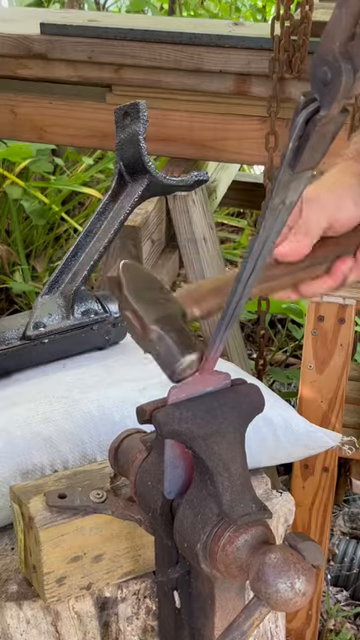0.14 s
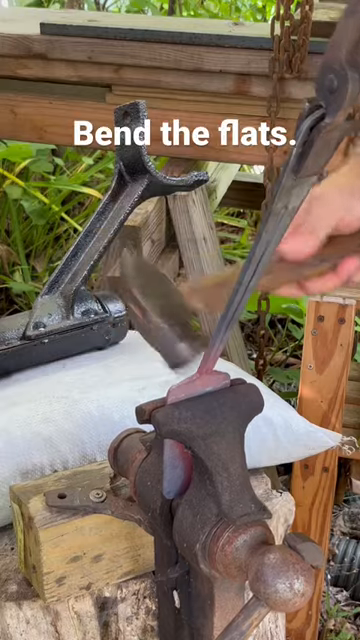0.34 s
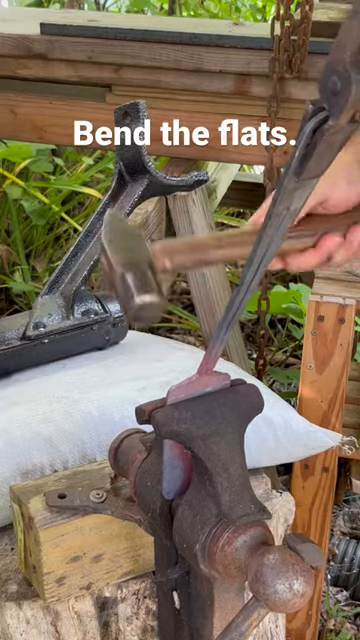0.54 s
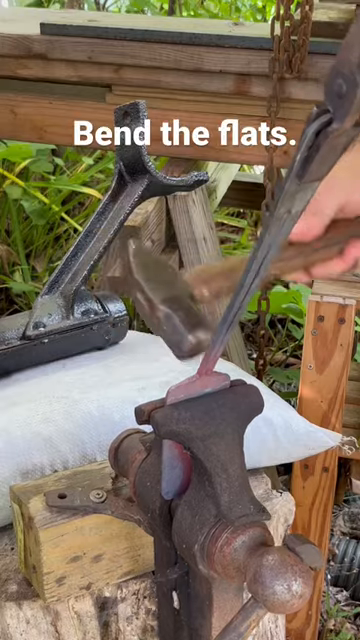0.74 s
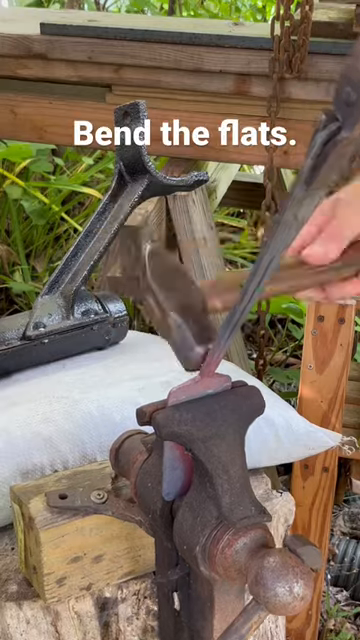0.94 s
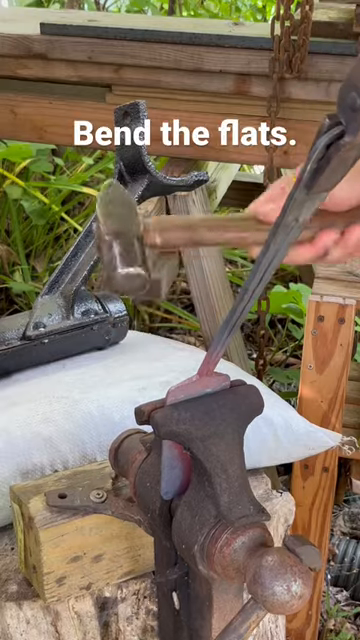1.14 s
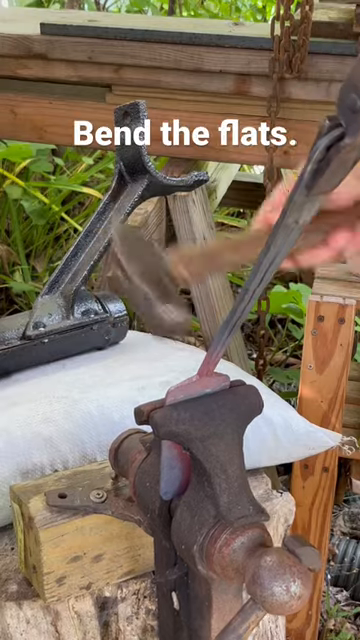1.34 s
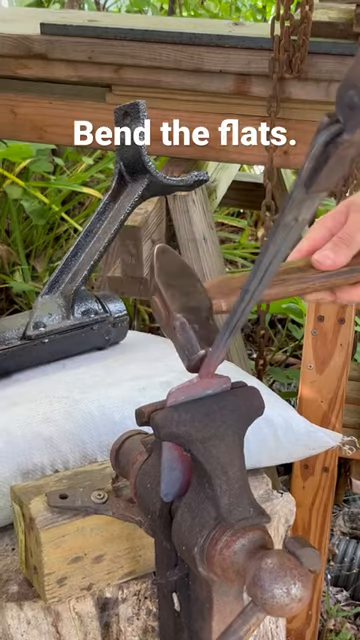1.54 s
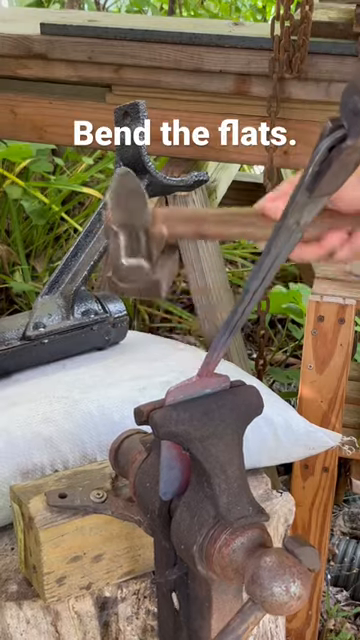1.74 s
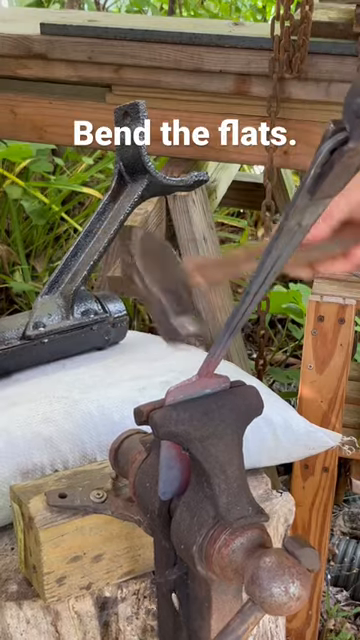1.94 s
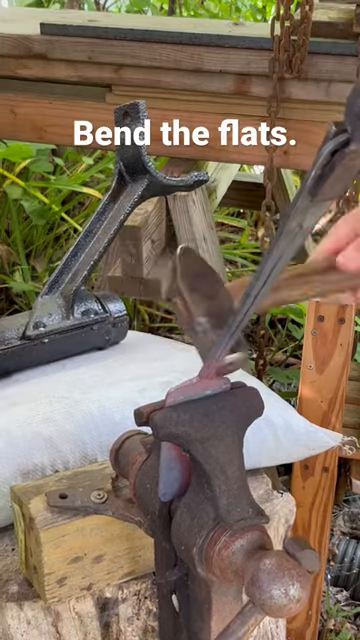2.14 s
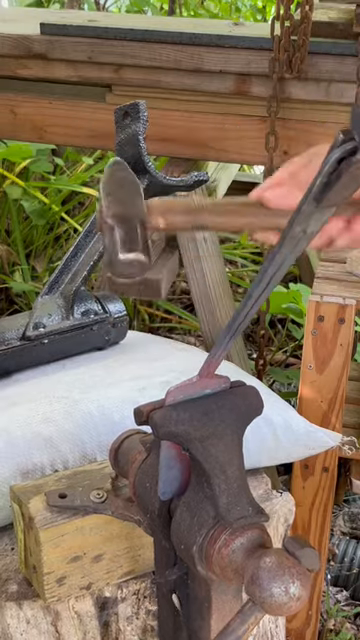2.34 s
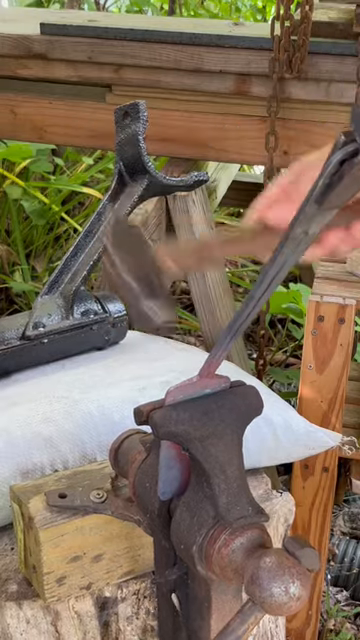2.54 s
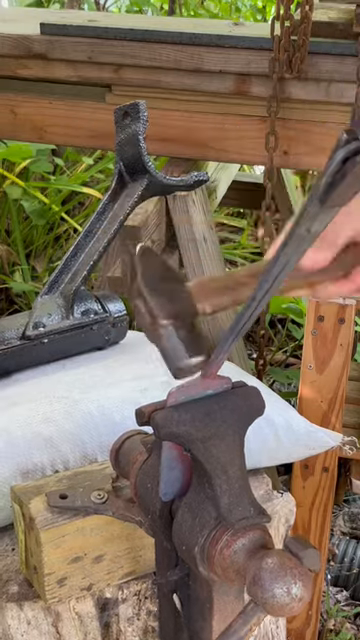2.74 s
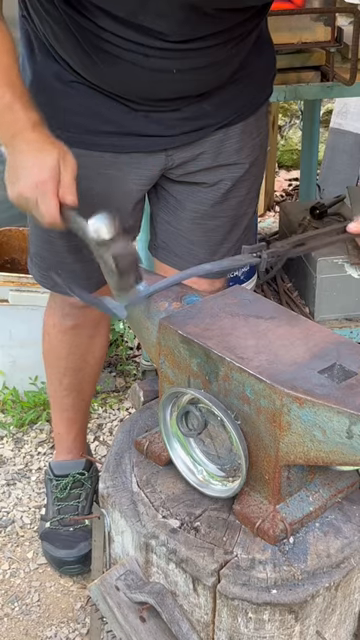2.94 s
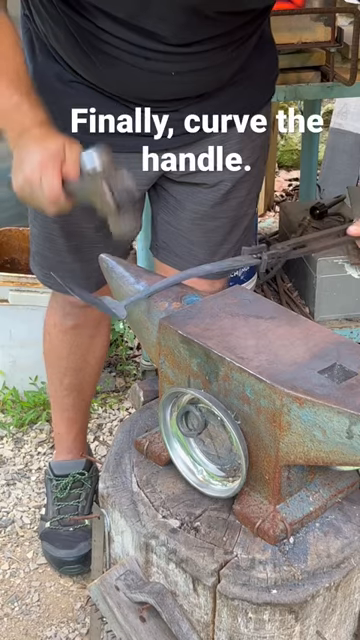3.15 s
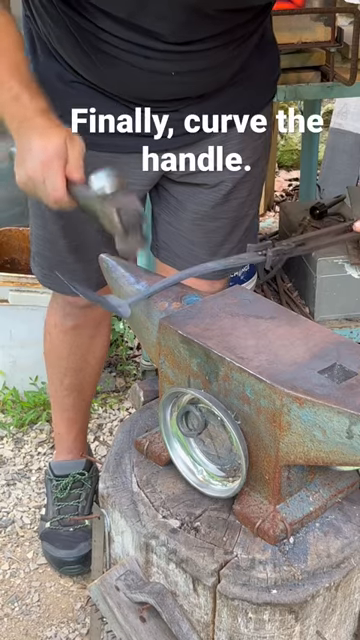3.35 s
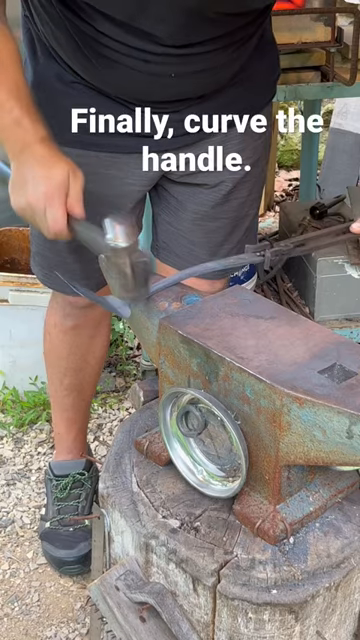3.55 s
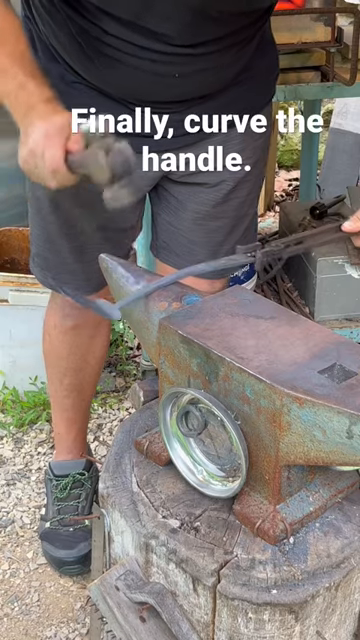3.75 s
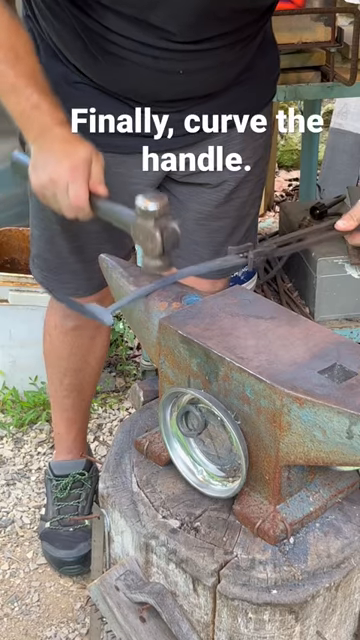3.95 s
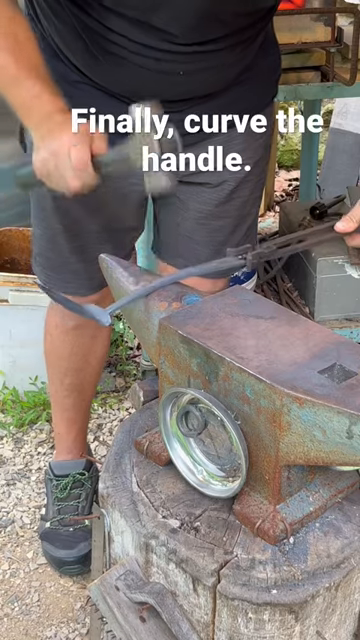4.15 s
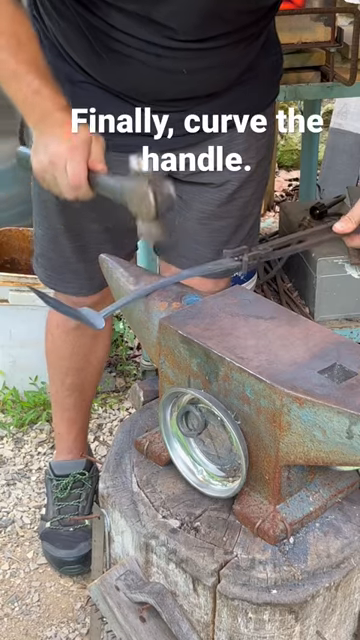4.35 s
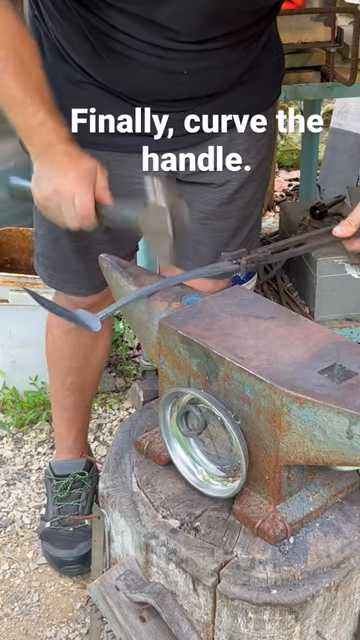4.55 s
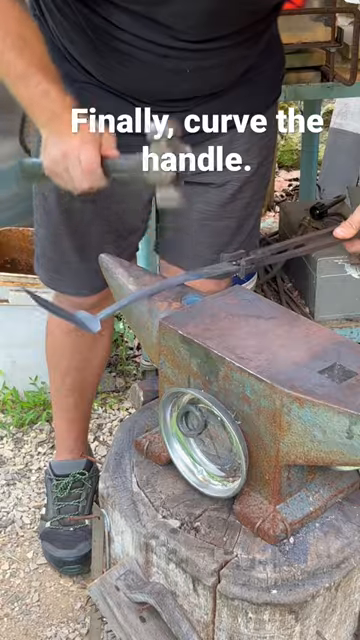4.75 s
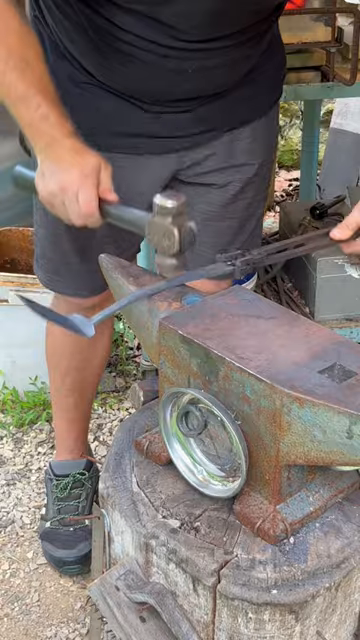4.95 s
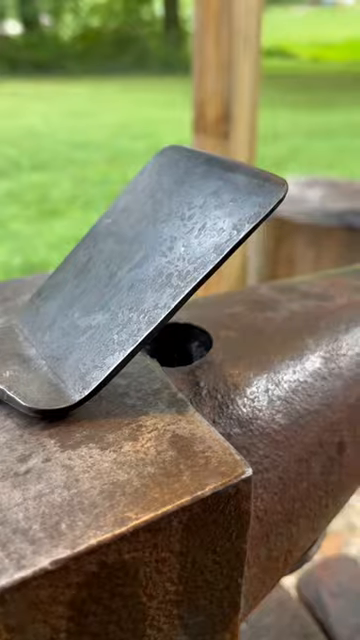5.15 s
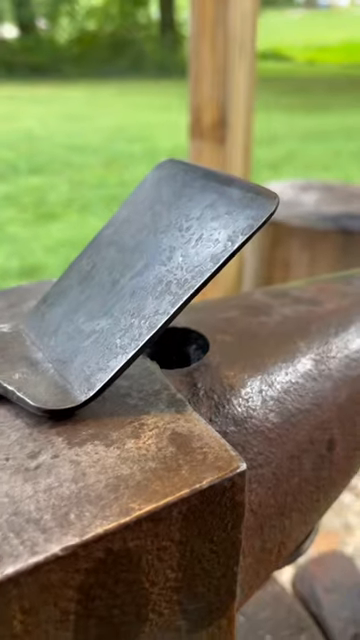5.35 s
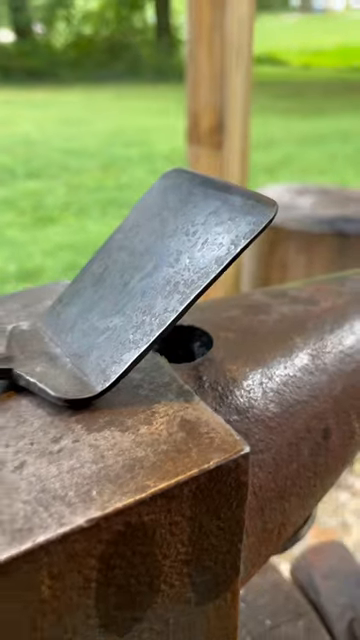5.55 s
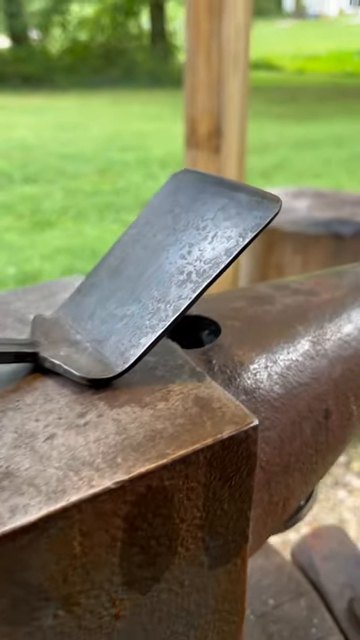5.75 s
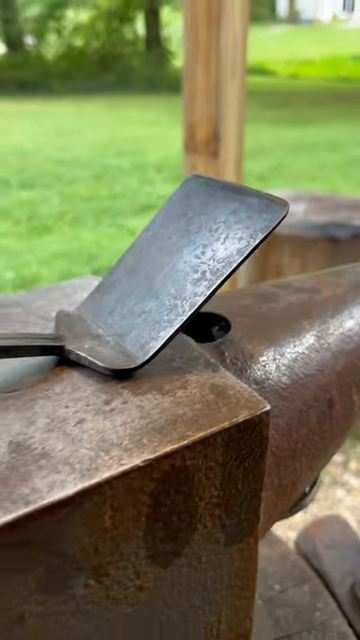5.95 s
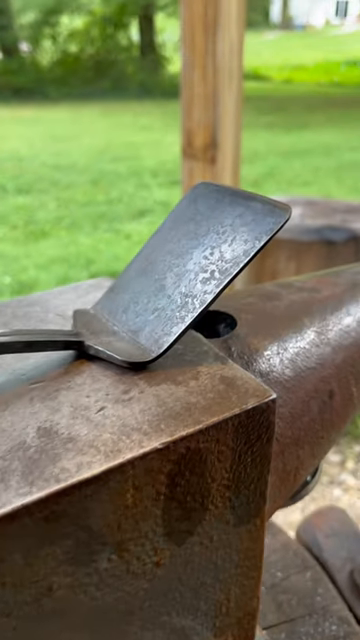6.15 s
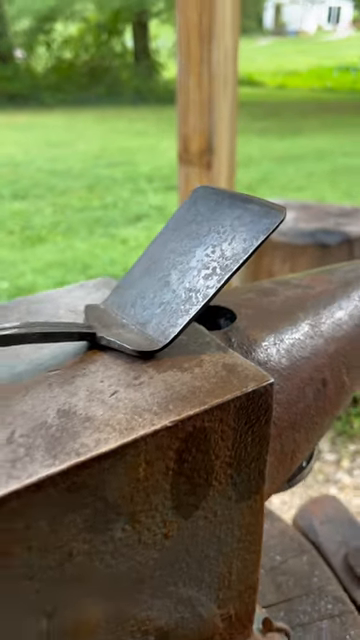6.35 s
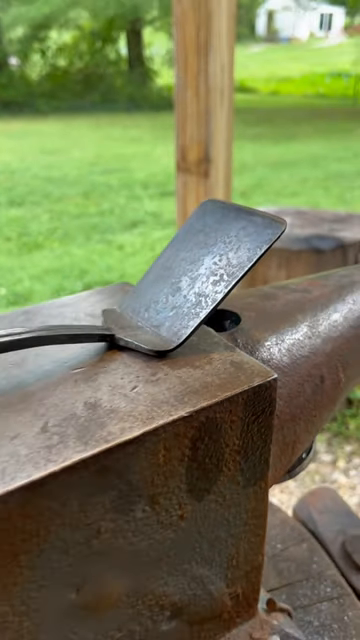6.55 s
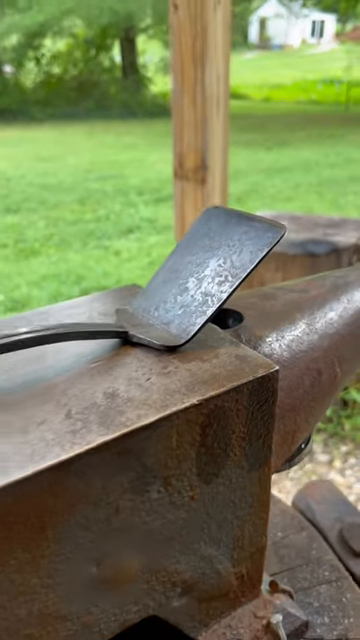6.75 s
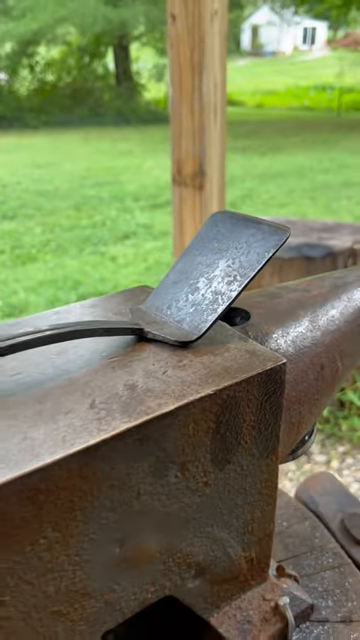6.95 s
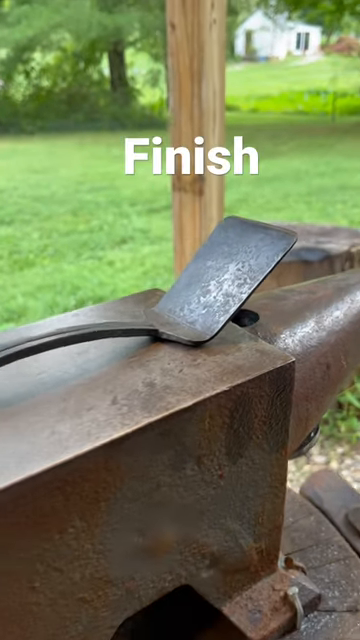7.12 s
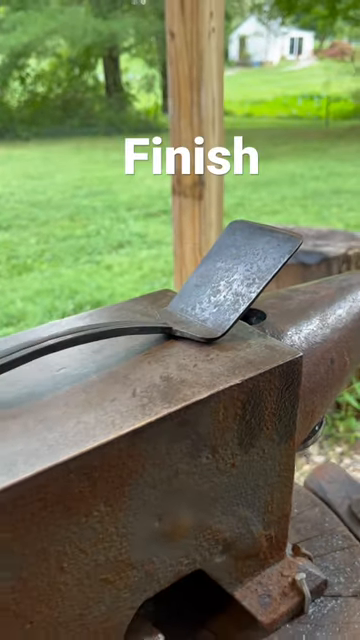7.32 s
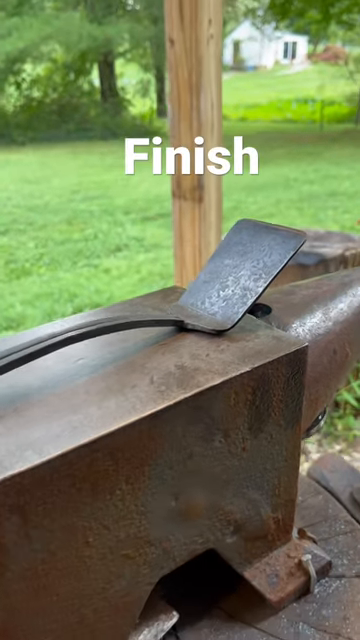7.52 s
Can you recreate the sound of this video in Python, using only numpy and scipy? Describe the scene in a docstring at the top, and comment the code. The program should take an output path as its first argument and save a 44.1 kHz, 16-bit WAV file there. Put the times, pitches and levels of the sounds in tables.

```python
"""Open-sided smithy in four short takes: a flat blow on the anvil face over a dull forge roar; a hammer bending
hot steel in a vise beside a roaring gas forge; blows curving a bar on the ringing horn, forge far off; a quiet
yard with insects. Blows are noise bursts plus decaying modes and low thuds; the forge is resonances driven by
slow noise over shaped noise; the yard is shaped noise. The result is stereo, the left channel ahead in the
treble."""
import sys
import numpy as np
from scipy import signal
from scipy.fft import rfft, irfft
from scipy.io import wavfile
from scipy.ndimage import uniform_filter1d

SR = 44100
rng = np.random.default_rng(int(sys.argv[2]) if len(sys.argv) > 2 else 0)


def unload_wav(signal):
    """Save mono or channel-first audio to the path in sys.argv[1] as 16-bit WAV at rate SR, clipped to [-1, 1]."""
    wavfile.write(
        sys.argv[1],
        SR,
        np.round(np.clip(np.atleast_2d(signal).T, -1, 1) * 32767).astype(np.int16),
    )


N = 334263

# Ends of the face, vise and horn takes: end_s
TAKE_ENDS_S = (.0946, 2.858, 5.118)
FACE_END_S, VISE_END_S, HORN_END_S = TAKE_ENDS_S

# Flat blow on the anvil face: start_s, level_db
FACE_BLOW = (.0898, -8)
# Modes of the anvil face: mode_hz, level_db, t60_s (each ring() call scales the t60 of its modes)
FACE_MODES = [(725, 0, .04), (1300, 1.5, 0.037), (1680, -7, .04), (2390, 2.5, 0.044), (3014, -12, .03),
              (4000, 1, 0.035), (5460, -18.5, .03), (6400, -14, 0.034), (7950, -15, .03),
              (9500, -10.5, .03)]
# Forge heard from the face: freq_hz, density_db_per_hz
FACE_FORGE_SPECTRUM = [(30, -72.5), (60, -57), (140, -51), (340, -53), (600, -78.5), (1000, -64.5),
                       (1500, -94.5), (2230, -75), (2700, -89.5), (4000, -92.5), (8000, -93.5),
                       (12000, -100), (15000, -115)]

# Forge chamber resonances: centre_hz, pole_width_hz, level_db (strongest row takes its level from BURNER)
CHAMBER_MODES = [(58.2, 3, -35.5), (85.5, 10, -44), (108.4, 8.7, -25), (144.9, 18, -33), (171.5, 3, -37.5),
                 (215.4, 4.6, -40), (289.3, 14, -46.5), (370, 22, -45), (434, 14, -50), (1051, 54, -51),
                 (1820, 200, -57.5)]
# Burner swell: time_s, hum_db
BURNER = [(0.1, -21), (0.15, -25.5), (0.28, -18.5), (0.35, -29.5), (0.46, -21), (0.51, -26), (0.64, -18),
          (0.84, -32.5), (0.91, -22.5), (1.24, -24), (1.3, -36.5), (1.5, -20), (1.7, -33), (1.75, -22.5),
          (1.9, -32), (2.15, -26), (2.21, -39.5), (2.31, -25), (2.47, -36.5), (2.49, -28), (2.57, -48),
          (2.63, -24.5), (2.86, -36)]
# Flame noise, before a 6 dB cut below 500 Hz: freq_hz, density_db_per_hz
ROAR_SPECTRUM = [(30, -64.5), (57, -62.5), (80, -50.5), (110, -39), (145, -66.5), (200, -56.5), (400, -63),
                 (700, -73), (1050, -76), (1500, -78), (2100, -78), (3000, -82.5), (8000, -94),
                 (15000, -110)]
HISS_SHARE = 0.19  # part of the hum's dB swell that the flame noise follows

# Blows at the vise: start_s, strength_db, brightness_db_per_octave, vise_clank_db
VISE_BLOWS = [(0.1117, -1, -0.8, -19.5), (0.3763, 0.2, 0.5, -17), (0.6629, -0.5, 1.5, -15.5),
              (0.9572, -1.5, 3, -21), (1.2413, -4, 2.7, -22.5), (1.5461, -1, -0.8, -19),
              (1.838, 2, 0.9, -17), (2.137, 0.1, 0, -24), (2.4373, -4.5, 1.3, -32.5), (2.7416, 2, 1, -21.5)]
# Colour of the vise crack, only its shape counts: freq_hz, density_db_per_hz
VISE_CRACK = [(200, -47), (400, -53), (800, -45.5), (1500, -54), (2200, -50.5), (3000, -48.5),
              (4500, -50.5), (6500, -54), (9000, -57), (12000, -59), (15500, -67.5)]
# Colour of the vise rattle, only its shape counts: freq_hz, density_db_per_hz
VISE_RATTLE = [(200, -58), (400, -51.5), (800, -66), (1500, -66), (2200, -60.5), (3000, -60), (4500, -62),
               (6500, -69), (9000, -73), (12000, -75), (15500, -77.5)]
# Modes of the hammer head: mode_hz, level_db, t60_s
HAMMER_HEAD_MODES = [(2230, -2.5, 0.012), (4900, -1.5, .014), (6470, 0.5, 0.0097), (10400, 0.5, 0.0037)]
# Modes of the vise with the clamped blade: mode_hz, level_db, t60_s
VISE_MODES = [(288, 0.5, 0.089), (718, 0, 0.077), (916, 1.5, 0.024), (1250, -1.5, 0.044), (1446, -3, 0.073),
              (1805, 0, .05), (2110, -3.5, 0.03), (2600, 3.5, .05), (2910, 1.5, .08), (3150, -2.5, 0.041),
              (3530, -15, 0.054), (4000, -21.5, .05), (4540, -2, 0.029), (5050, 4, .05), (6200, -24, 0.014),
              (6120, 9, .05), (9420, -7.5, 0.022), (11100, -6, 0.036)]
VISE_RATTLE_DB, VISE_RATTLE_T60_S = -17.5, 0.15  # level relative to the blow's strength
VISE_THUD_DB, THUD_DB_PER_BRIGHTNESS = -21.5, -2  # duller blows push the bench harder

# Work and tongs knocking back: start_s, level_db, chatter_t60_s, brightness_db_per_octave, handle_knock_db
REBOUNDS = [(0.4162, -11.5, 0.049, -0.3, -29), (0.9722, -24, .092, 1, -48), (1.0128, -26, 0.047, -2.5, -25),
            (1.2544, -23, 0.15, 0.1, -45), (1.2859, -15.5, .063, 1.5, -50), (1.5577, -15, 0.1, -3, -33),
            (1.5938, -14.5, 0.068, -0.2, -20), (1.8592, -19.5, 0.088, -1, -21.5),
            (2.1478, -11, 0.098, -0.7, -19), (2.4488, -19, 0.16, 2.5, -38),
            (2.4783, -10.5, 0.052, 4.5, -41), (2.9164, -14.5, 0.15, 2.5, -48),
            (3.2364, -13.5, 0.14, 2.5, -27), (3.2697, -18, .14, 3, -46), (3.6042, -15.5, 0.1, 2.5, -43),
            (3.626, -23, .07, 7, -48), (3.9428, -13.5, 0.042, 0.2, -28), (3.9708, -22.5, 0.14, 4, -48),
            (4.0034, -30, 0.15, 0, -56), (4.0167, -32, .11, 5, -54), (4.2597, -13, 0.11, -3, -23),
            (4.5995, -9, 0.083, 0.5, -22)]
# Mode of the wooden handle: mode_hz, level_db, t60_s
HANDLE_MODES = [(730, 0, 0.083)]
REBOUND_CLANK_DB, CLANK_SHARE = -28, .3  # the clank follows only a share of the rebound's dB

# Blows on the horn: start_s, strength_db, brightness_db_per_octave, clank_db, low_knock_db,
# ring_family_1_db, ring_family_2_db, bar_settles_after_s
HORN_BLOWS = [(2.8828, -10, 1.6, -13.5, -16.5, -20, -35, .4), (3.2249, -8, 1, -18, -23, -26, -32, 0.15),
              (3.5739, -5, 1.1, -14, -10.5, -18.5, -46, 0.33),
              (3.9147, -6, 1.9, -18.5, -10, -16.5, -33, 0.13), (4.244, -3, 1.3, -18, -14, -16, -30.5, .4),
              (4.585, -2.5, 1.04, -19.5, -10.5, -15, -33.5, .4),
              (4.915, -3, 0.3, -15.5, -8.5, -17.5, -39, .4)]
# Colour of the anvil crack, only its shape counts: freq_hz, density_db_per_hz
HORN_CRACK = [(200, -46), (400, -47.5), (800, -42.5), (1500, -56.5), (2200, -40.5), (3000, -61),
              (4500, -50), (6500, -60), (9000, -55), (12000, -54), (15500, -59)]
# Colour of loose bar and tongs, only its shape counts: freq_hz, density_db_per_hz
HORN_RATTLE = [(200, -52.5), (400, -55.5), (800, -70.5), (1500, -62), (2200, -60.5), (3000, -58.5),
               (4500, -59.5), (6500, -65), (9000, -64.5), (12000, -67), (15500, -73)]
# Modes of bar and tongs clanking: mode_hz, level_db, t60_s
BAR_MODES = [(1292, -18, 0.33), (1500, -13.5, 0.13), (1780, -7.5, 0.053), (3040, -14.5, 0.11),
             (3220, -15.5, 0.19), (3390, -4, .07), (3730, -4, .06), (3970, -6, 0.13), (5120, -2.5, 0.078),
             (6500, -3, .06), (8150, -5, .08), (8560, -9, 0.077), (10620, -6, .07), (12300, -8, 0.045)]
# Low modes of the bar bending: mode_hz, level_db, t60_s
BAR_LOW_MODES = [(357, -3, .06), (419, 0, 0.051), (533.6, -12.5, 0.17), (635, -8.5, 0.1),
                 (755, -12.5, 0.041), (1047, -1.5, 0.034)]
# Two families of anvil modes, which the spot struck rings unequally: mode_hz, level_db, t60_s
ANVIL_FAMILIES = [
    [(2229, 0, .39), (4544, -16, .28)],
    [(2767, 0, .42), (5518, 2, .17)],
]
HORN_RATTLE_DB, HORN_RATTLE_T60_S = -18.5, 0.22  # same level at every blow
HORN_THUD_DB = -6.5  # stump relative to the low knock
BAR_SPREAD_DB = 3  # random balance of modes in horn clanks and all rebound clanks

# Distant forge: freq_hz, density_db_per_hz
DISTANT_SPECTRUM = [(30, -87.5), (57, -56), (85, -64), (110, -67), (170, -73), (230, -77.5), (300, -77),
                    (375, -70), (440, -92), (1000, -93.5), (3000, -97), (5000, -101), (8000, -97),
                    (12000, -110), (15500, -122)]
# Level of the low band below 450 Hz, used about its mean: time_s, level_db
LOW_BAND_LEVEL = [(2.86, -42.5), (3.302, -42), (3.8, -44), (4.0, -40.5), (4.3, -45), (5.12, -43.5)]

# Quiet yard, insect chorus at 7-8 kHz: freq_hz, density_db_per_hz
YARD_SPECTRUM = [(25, -102), (60, -67), (100, -73), (200, -89), (500, -92.5), (1000, -93), (1800, -104),
                 (3100, -117), (4500, -99), (5600, -101.5), (6900, -91.5), (7300, -98), (8100, -84.5),
                 (9100, -105), (12500, -112), (14500, -130)]
# Likeness of the channels in the yard: freq_hz, likeness_0_to_1
YARD_SAME = [(60, 0.98), (200, 0.97), (500, 0.33), (1500, 0.55), (3000, 0.93), (5000, 0.93), (6500, 1)]
# Likeness of the channels in the shop: freq_hz, likeness_0_to_1
SHOP_SAME = [(60, 1), (150, 1), (300, 0.96), (700, 0.68), (1500, 0.65), (3000, 1)]
# Phase lead of the left channel: freq_hz, lead_rad
LEFT_LEAD = [(0, 0), (200, 0), (520, 1.15), (1550, 0.4), (2070, 0.77), (2580, 2.5), (3100, 1.6),
             (3800, 1.32), (5100, 1.7355), (5700, 2.5), (7750, 7), (8300, 6.5), (10330, 9.5), (12400, 12),
             (14500, 15.5), (17000, 18)]
# Left minus right level: freq_hz, difference_db
LEFT_LEVEL = [(60, 0.5), (120, -2), (240, -3.5), (480, -6.5), (950, 0), (1890, 1.0), (3770, -1), (7520, 0),
              (15000, 0.0)]
EDGE_HZ = 16700  # final low-pass


def amp(db):
    """Decibels to gain."""
    return 10 ** (np.asarray(db) / 20)


def evened(x):
    """Scales to rms 1."""
    return x / np.sqrt(np.mean(x ** 2) + 1e-20)


def read(points, hz):
    """Interpolates a frequency table on a log-frequency axis."""
    f, value = np.transpose(points)
    return np.interp(np.log(hz + 1), np.log(f + 1), value)


def add(mix, start_s, sound):
    """Mixes a sound in at start_s, trimmed to the end of the mix."""
    part = mix[:, round(start_s * SR):][:, :sound.shape[-1]]
    part += sound[..., :part.shape[1]]


def take(start_s, end_s, fade_s=.004):
    """Gate of one take, with short fades centred on its ends."""
    t = np.arange(N) / SR
    return np.clip(np.minimum(t - start_s, end_s - t) / fade_s + .5, 0, 1)


def noise(field_db, same, size, length):
    """Two-channel noise from random short-time spectra; field_db(hz, t) gives dB per Hz."""
    hop = size // 4
    hz = np.fft.rfftfreq(size, 1 / SR)[:, None]
    t = np.arange(length // hop + 6) * hop / SR
    a, b, c, d = rng.standard_normal((len(t), len(hz), 4)).T
    right = a + 1j * b
    like = np.clip(read(same, hz), 0, 1)
    left = like * right + np.sqrt(1 - like ** 2) * (c + 1j * d)
    spectra = np.array([left, right]) * amp(field_db(hz, t))
    channels = signal.istft(spectra, nperseg=size, noverlap=size - hop)[1][:, :length]
    return np.sqrt(1.5 * SR / size) * channels


def wander(shape, width):
    """Random patches of rms 1, smoothed over width = (bins, frames)."""
    patches = rng.standard_normal(shape[::-1]).T
    patches = uniform_filter1d(patches, width[0], 0)
    return evened(uniform_filter1d(patches, width[1], 1))


def burst(db, colour, t60_s, tilt_db, rise_s, lumpy_db, damping):
    """Dense short modes of loose steel: noise whose treble dies first, uneven as parts chatter."""
    t = np.arange(int(.4 * SR)) / SR

    def field_db(hz, frames):
        damping_db = 60 * frames / t60_s * (1 - ((hz + 300) / 4000) ** damping)
        lumps_db = lumpy_db * wander((len(hz), len(frames)), (2, 5))
        return read(colour, hz) + tilt_db * np.log2((hz + 100) / 3000) + lumps_db + damping_db

    steel = noise(field_db, SHOP_SAME, size=128, length=len(t))
    steel = signal.lfilter(*signal.butter(2, 260, "high", fs=SR), steel)  # small parts radiate no bass
    shape = amp(db - 60 * t / t60_s) * np.clip(t / max(rise_s, 1e-4), 0, 1) ** 2
    # right channel gets the energy of the envelope
    return steel * shape * np.linalg.norm(shape) / np.linalg.norm(steel[1] * shape)


def ring(modes, db, longer, spread_db, slow_cycles):
    """Decaying modes; the spot struck shifts their balance, and low modes need more time to build."""
    t = np.arange(int(.6 * SR)) / SR
    hz, mode_db, t60_s = np.transpose(modes)[:, :, None]
    spot, phase = rng.standard_normal((len(modes), 2, 1)).swapaxes(0, 1)
    level = amp(db + mode_db + spread_db * spot - 60 * t / (t60_s * longer))
    onset = 1 - np.exp(-(t * hz / slow_cycles) ** 2)
    return (level * np.sin(2 * np.pi * (hz * t + phase)) * onset).sum(0)


def face_blow():
    """Flat blow on the anvil face: short modes and a crack."""
    mix = np.zeros((2, N))
    start_s, db = FACE_BLOW
    add(mix, start_s, ring(FACE_MODES, db, longer=0.87, spread_db=0, slow_cycles=1.5))
    add(mix, start_s, burst(-13, HORN_CRACK, .05, .1, .0008, 3.8, .05))
    return mix * take(-1, FACE_END_S, fade_s=0.00058)


def face_forge():
    """Dull, steady forge roar in the face take: shaped noise."""
    def field_db(hz, frames):
        return read(FACE_FORGE_SPECTRUM, hz) + 0 * frames
    return noise(field_db, SHOP_SAME, size=1024, length=N) * take(-1, FACE_END_S)


def forge():
    """Flame noise excites the chamber: fuzzy low tones over a broad roar."""
    time_s, hum_db = np.transpose(BURNER)
    swing_db = hum_db - hum_db.mean()
    t, hum = np.arange(N) / SR, 0
    for k, (hz, width_hz, db) in enumerate(CHAMBER_MODES):
        r = np.exp(-np.pi * width_hz / SR)
        slow = rng.standard_normal((2, N))
        for _ in range(2):
            slow = signal.lfilter([1], [1, -r], slow)
        drive = slow[0] + 1j * slow[1]
        if k == 2:  # strongest mode: wandering phase only, level from the hum curve
            drive = np.exp(1j * np.angle(drive)) * amp(np.interp(t, time_s, hum_db))
        else:
            drive = drive / np.sqrt(np.mean(abs(drive) ** 2))
            drive = drive * amp(db + 0.26 * np.interp(t, time_s, swing_db))
        hum = hum + np.sqrt(2) * (drive * np.exp(2j * np.pi * hz * t)).real

    def roar_db(hz, frames):
        swell_db = HISS_SHARE * np.interp(frames, time_s, swing_db)
        lumps_db = 1.5 * wander((len(hz), len(frames)), (10, 12))
        return read(ROAR_SPECTRUM, hz) - 6 * (hz < 500) + swell_db + lumps_db

    roar = noise(roar_db, SHOP_SAME, size=1024, length=N)
    return (hum + roar) * take(FACE_END_S, VISE_END_S)


def thud(db, hz, t60_s, swell_s):
    """The stump or bench takes the push: low noise that swells after the blow."""
    t = np.arange(int(.3 * SR)) / SR
    band = signal.butter(2, [0.14 * hz, hz], "band", fs=SR)
    low = signal.lfilter(*band, rng.standard_normal(len(t)))
    shape = amp(db - 60 * t / t60_s) * (1 - np.exp(-(t / swell_s) ** 2))
    return low * shape * np.linalg.norm(shape) / np.linalg.norm(low * shape)


def vise_blows():
    """Each blow at the vise: crack, hammer head, clank, rattle and bench thud."""
    mix = np.zeros((2, N))
    for s, db, tilt_db, clank_db in VISE_BLOWS:
        thud_db = VISE_THUD_DB + THUD_DB_PER_BRIGHTNESS * tilt_db
        add(mix, s, burst(db - 3.5, VISE_CRACK, 0.015, tilt_db, .0006, 3.5, .05))
        add(mix, s, ring(HAMMER_HEAD_MODES, db - 3, 0.69, 3.16, 4.1))
        add(mix, s, ring(VISE_MODES, clank_db, 0.52, 3.4, 0.97))
        add(mix, s, burst(db + VISE_RATTLE_DB, VISE_RATTLE, VISE_RATTLE_T60_S, tilt_db, 0.0062, 1.9, .15))
        add(mix, s, thud(thud_db, 350, .15, 0.007))
    return mix * take(-1, VISE_END_S)


def rebounds():
    """Work and tongs knock back after a blow: chatter, handle knock and a clank of vise or bar."""
    vise, horn = np.zeros((2, 2, N))
    for s, db, t60_s, tilt_db, knock_db in REBOUNDS:
        mix, modes = (horn, BAR_LOW_MODES + BAR_MODES) if s > VISE_END_S else (vise, VISE_MODES)
        clank_db = REBOUND_CLANK_DB + CLANK_SHARE * db
        add(mix, s, burst(db - 6, VISE_CRACK, t60_s, tilt_db, 0.0016, 4.5, .1))
        add(mix, s + .004, ring(HANDLE_MODES, knock_db, 0.92, 0, 2.2))
        add(mix, s, ring(modes, clank_db, .9, BAR_SPREAD_DB, 1.8))
    return vise * take(-1, VISE_END_S) + horn * take(-1, HORN_END_S)


def distant_forge():
    """The forge heard from the anvil: a lumpy rumble and a faint hiss."""
    time_s, db = np.transpose(LOW_BAND_LEVEL)

    def field_db(hz, frames):
        swell_db = np.interp(frames, time_s, db - db.mean()) * (hz < 450)
        return read(DISTANT_SPECTRUM, hz) + swell_db + 3.4 * wander((len(hz), len(frames)), (6, 8))
    return noise(field_db, SHOP_SAME, size=2048, length=N) * take(VISE_END_S, HORN_END_S)


def anvil_ring(family_db, settles_s):
    """The long ring; it dies quickly once the bar rests on the horn again."""
    sound = sum(ring(modes, db, 0.99, 0, 5.2) for modes, db in zip(ANVIL_FAMILIES, family_db))
    rested_s = np.maximum(np.arange(len(sound)) / SR - settles_s, 0)
    return sound * amp(-330 * rested_s)


def horn_blows():
    """Each blow on the horn: tick, crack, bar clank, low knock, rattle, stump thud and anvil ring."""
    mix = np.zeros((2, N))
    for s, db, tilt_db, clank_db, low_db, *family_db, settles_s in HORN_BLOWS:
        add(mix, s, burst(db - 1, HORN_CRACK, 0.0121, tilt_db + 3, 0.00055, 2.5, .05))  # first tick
        add(mix, s, burst(db - 5.5, HORN_CRACK, 0.031, tilt_db, .0015, 3.5, 0.086))
        add(mix, s, ring(BAR_MODES, clank_db, 0.68, BAR_SPREAD_DB, 1.5))
        add(mix, s, ring(BAR_LOW_MODES, low_db, 0.85, 0.94, 0.84))
        add(mix, s, burst(HORN_RATTLE_DB, HORN_RATTLE, HORN_RATTLE_T60_S, tilt_db, .004, 4.8, .15))
        add(mix, s, thud(low_db + HORN_THUD_DB, 270, 0.16, .016))
        add(mix, s, anvil_ring(family_db, settles_s))
    return mix * take(-1, HORN_END_S)


def yard():
    """Far rumble, air and many insects, throbbing a little: noise with a wandering level."""
    def field_db(hz, frames):
        throb_db = 0.5 * wander((1, len(frames)), (1, 6)) * (hz > 4000)
        return read(YARD_SPECTRUM, hz) + throb_db + 0.35 * wander((len(hz), len(frames)), (6, 20))
    return noise(field_db, YARD_SAME, size=1024, length=N) * take(HORN_END_S, 9)


def scene():
    """All sources, left and right channel."""
    face = face_blow() + face_forge()
    vise_and_horn = forge() + vise_blows() + rebounds() + distant_forge() + horn_blows()
    return face + vise_and_horn + yard()


def record(dry):
    """The left channel leads and loses some low mids; peaks clip softly; then the band limit."""
    padded = N + SR
    hz = np.fft.rfftfreq(padded, 1 / SR)
    left_response = amp(read(LEFT_LEVEL, hz)) * np.exp(1j * np.interp(hz, *np.transpose(LEFT_LEAD)))
    left = irfft(rfft(dry[0], padded) * left_response, padded)[:N]
    both = np.array([left, dry[1]])
    both = .97 * np.tanh(both / .97)
    top = signal.firwin2(255, [0, 15300, 15900, SR / 2], [1, 1, amp(-24.5), amp(-31.5)], fs=SR)
    edge = np.convolve(top, signal.firwin(511, EDGE_HZ, window=("kaiser", 9), fs=SR))
    return signal.oaconvolve(both, edge[None], "same")


dry = scene()
out = record(dry)
unload_wav(out)
```